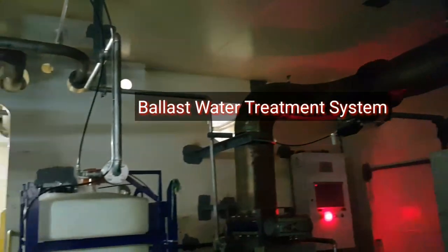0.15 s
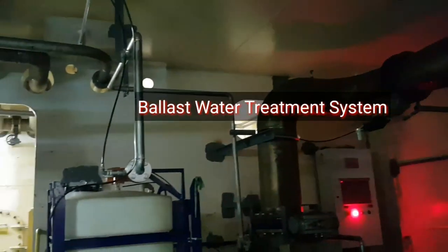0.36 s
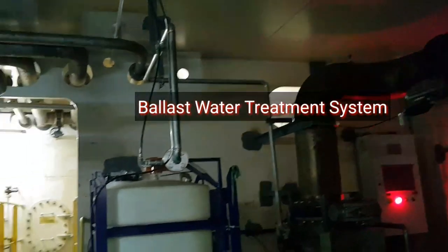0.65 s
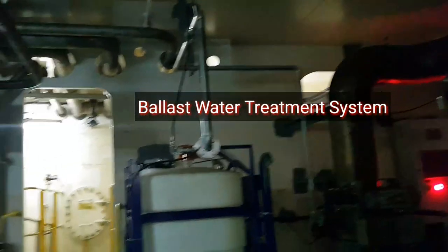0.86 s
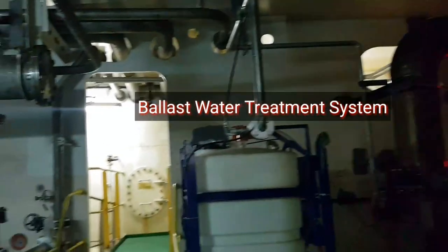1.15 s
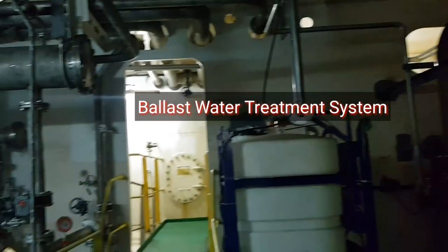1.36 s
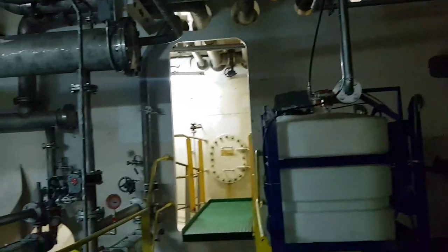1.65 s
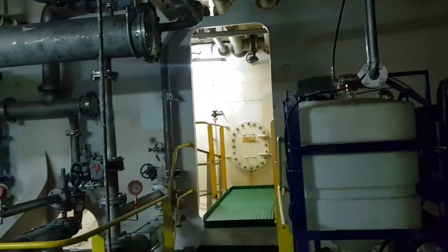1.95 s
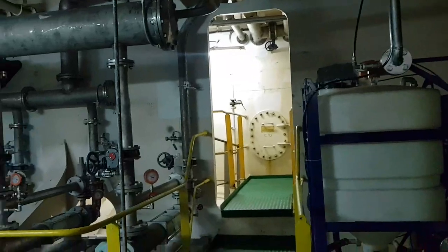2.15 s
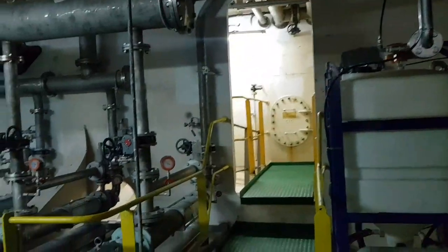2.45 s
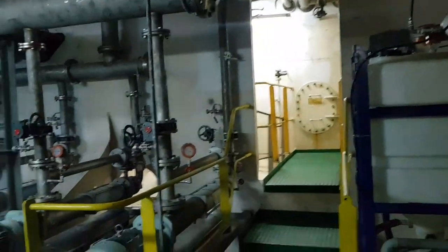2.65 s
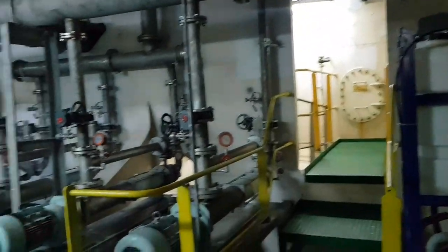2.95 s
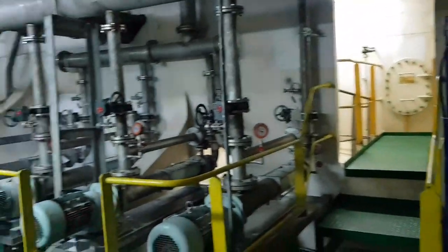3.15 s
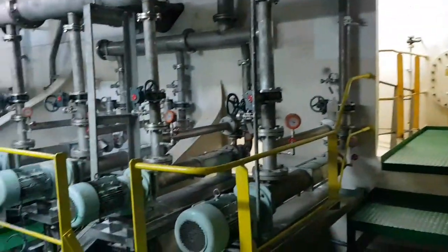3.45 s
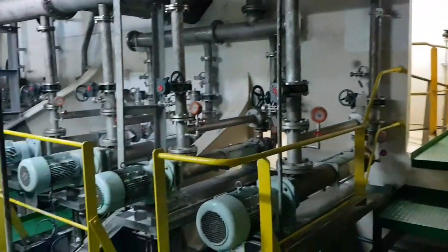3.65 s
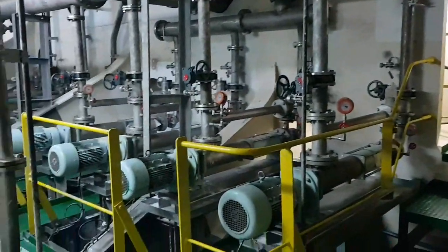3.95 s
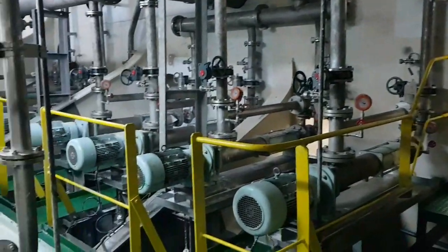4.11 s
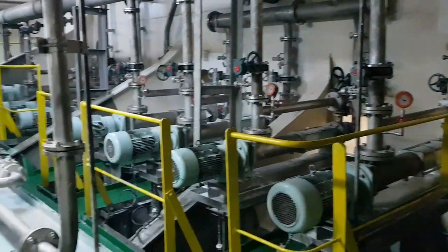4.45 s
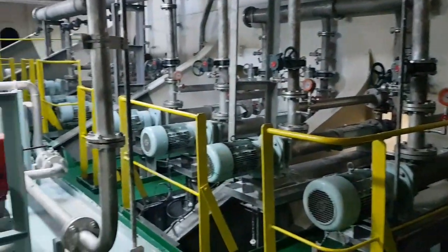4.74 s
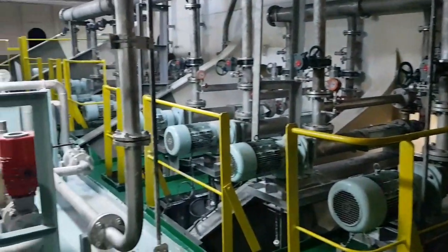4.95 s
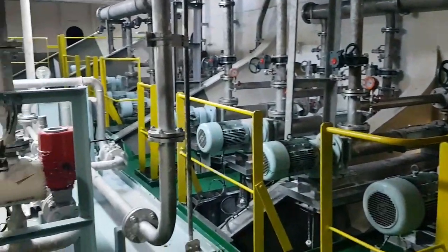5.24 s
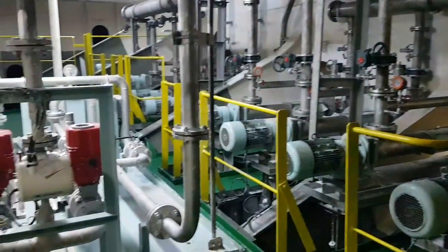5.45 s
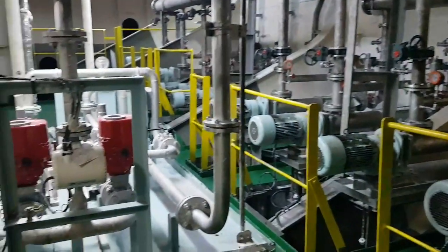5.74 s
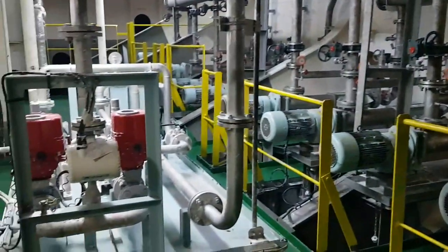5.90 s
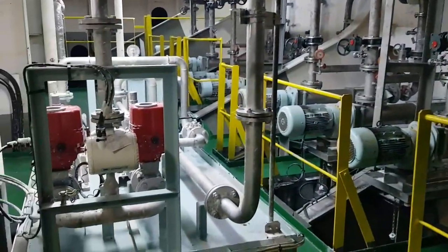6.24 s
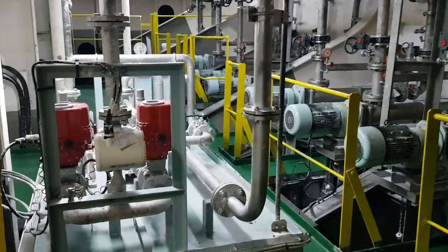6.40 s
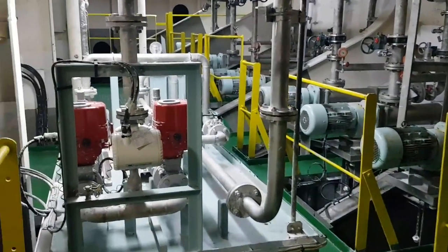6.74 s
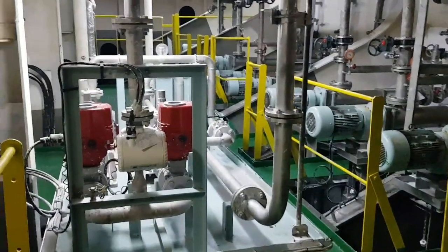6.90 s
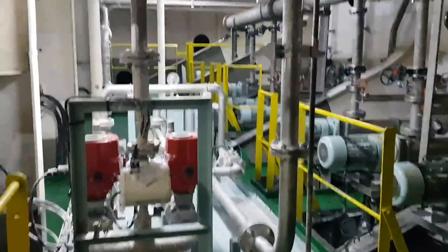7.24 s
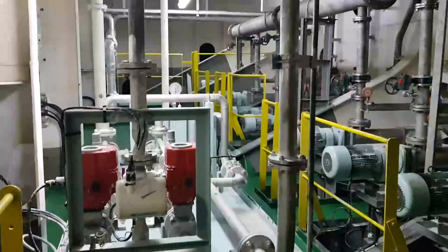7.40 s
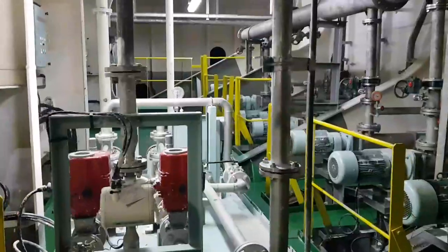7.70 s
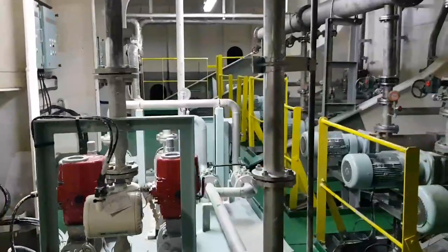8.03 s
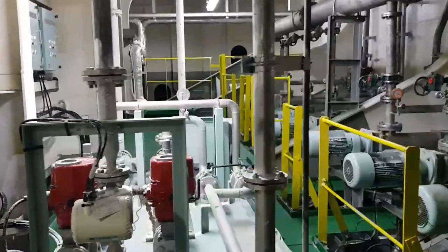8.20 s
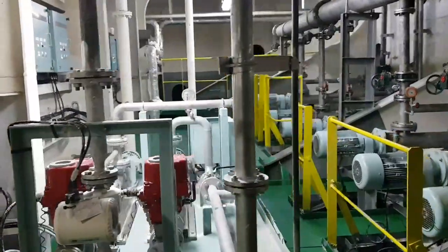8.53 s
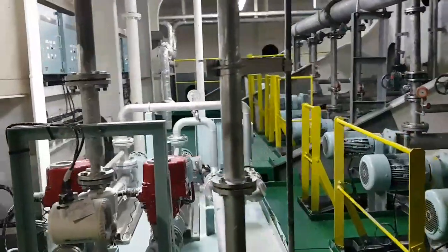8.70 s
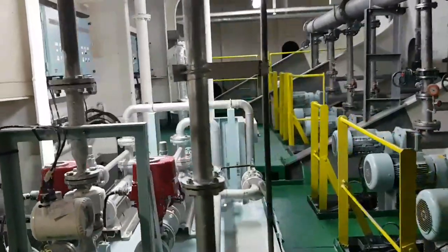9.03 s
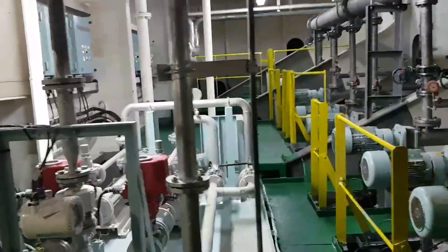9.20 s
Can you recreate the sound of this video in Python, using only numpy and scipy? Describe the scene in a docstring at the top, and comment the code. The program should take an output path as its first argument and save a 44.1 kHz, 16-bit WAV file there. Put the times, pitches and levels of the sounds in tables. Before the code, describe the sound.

Inside a large steel ship engine room, a dense low rumble and pipe-flow roar never stop. A slow main engine thumps unevenly through the hull, about eight firings a second. Generator hum and pump whines swell and dip as the listener walks past. High ventilation hiss sits on top. Near eight seconds a short bright rush passes, then the hum grows strong. Handheld stereo pickup, close and loud, no speech.

```python
"""A slow six-cylinder main engine thumps through the hull of a large steel engine room: firings strike its modes.
Generator and pump tones, wavering sines, swell and fade as one walks across the standing waves;
two gear pumps whine a little apart and blowers sing very high.
Pipe flow and ventilation, coloured noise, roar and hiss under it all; one brief bright rush comes near the end."""
import sys
import numpy as np
from scipy import signal
from scipy.fft import rfft, irfft, next_fast_len
from scipy.io import wavfile
from scipy.ndimage import uniform_filter1d, minimum_filter1d

SR = 44100
rng = np.random.default_rng(int(sys.argv[2]) if len(sys.argv) > 2 else 0)


def gain_from_decibels(decibels):
    """Convert decibel values to linear amplitude factors."""
    exponent = np.asarray(decibels, float) / 20
    return 10 ** exponent


def dump_mix(stems):
    """Bounce the given channels to the path in sys.argv[1] as a 16-bit WAV at rate SR."""
    frames = np.atleast_2d(stems).T  # one column per channel
    limited = np.clip(frames, -1, 1)  # hard clip at full scale
    pcm = np.round(limited * 32767).astype(np.int16)
    wavfile.write(sys.argv[1], SR, pcm)


N = 412776
SIZE = next_fast_len(N + 4096)
HZ = np.maximum(np.arange(SIZE // 2 + 1) * SR / SIZE, 1)
SECONDS = np.arange(N) / SR
TURNS_PER_S = 1.3235  # main engine

# likeness of the sound field at left and right: (frequency [Hz], correlation [0 to 1])
LIKENESS = [(30, 0.9), (60, 0.93), (130, 0.93), (280, 0.96), (430, 0.8), (640, 0.62), (950, 0.44),
            (1200, 0.37), (2000, 0.13), (2700, 0), (15000, 0)]


def main_engine():
    """Modal excitation: each firing strikes every damped hull mode, in a pattern that repeats once a turn."""
    # hull modes: (frequency [Hz], t60 [s], push from each of cylinders 1 to 6 [wave height before lift_db]);
    # the sign of a push is the direction in which that firing starts the mode swinging
    hull_modes = [(25.1, 0.35, -0.012, 0.023, -0.015, 0.043, -0.019, 0.016),
                  (33.5, 0.18, -0.054, 0.019, -0.022, 0.00011, -0.00082, 0.031),
                  (48.35, 0.95, -0.059, 0.057, -0.05, 0.028, -0.083, 0.01),
                  (60.5, 1, 0.0052, -0.023, -0.0011, 0.054, 0.084, 0.0007),
                  (82.1, 1, 0.069, 0.067, -0.098, 0.038, 0.077, 0.045),
                  (81.7, 0.32, -0.11, 0.0078, 0.067, -0.055, -0.085, -0.015),
                  (113, 0.35, -0.0026, -0.035, -0.0043, -0.014, 0.0018, -0.072),
                  (137.7, 1, -0.024, 0.049, -0.022, -0.016, 0.029, -0.036)]
    first_firing_s, lift_db, uneven_db = 0.102, 4.0, 0.5
    run_in = 2 * SR  # samples in which the modes build up beforehand
    firing = np.arange(-12, 6 * 12 + 2)
    firing_s = first_firing_s + firing / 6 / TURNS_PER_S
    at = np.round(firing_s * SR).astype(int) + run_in
    out = np.zeros(N + run_in)
    for hz, t60, *push in hull_modes:
        clicks = np.full(N + run_in, 1e-18)  # not quite zero, to keep the filter fast
        strength_db = lift_db + uneven_db * rng.standard_normal(len(at))
        clicks[at] = np.array(push)[firing % 6] * gain_from_decibels(strength_db)
        decay = gain_from_decibels(-60 / (t60 * SR))  # per sample
        angle = 2 * np.pi * hz / SR  # radians per sample
        out += signal.lfilter([0, np.sin(angle)], [1, -2 * decay * np.cos(angle), decay ** 2], clicks)
    out = signal.sosfilt(signal.butter(2, 16, "high", fs=SR, output="sos"), out)
    return out[run_in:]


def in_time(rows):
    """Linear interpolation: the columns of a time curve, sample by sample."""
    s, *columns = np.transpose(rows)
    return [np.interp(SECONDS, s, column) for column in columns]


def at_hz(points, hz):
    """Linear interpolation of a spectrum on a logarithmic frequency axis."""
    point_hz, value = np.transpose(points)
    return np.interp(np.log(hz), np.log(point_hz), value)


def drift(per_s):
    """Slow random process of spread 1: random points, per_s of them a second, joined by straight lines."""
    points = rng.standard_normal(400)
    joined = np.interp(SECONDS * per_s, np.arange(400), points)
    return np.sqrt(1.5) * joined  # the straight lines had cut the variance to 2/3


def tone(hz, level_db, waver_db, waver_per_s, smear, wander):
    """Interference: a sine wavers in strength and phase; reflections make the left phase wander about the right.

    smear [radians] is the spread of the phase; wander scales the left phase's departure, greater where
    the two sides are less alike.
    """
    phase = 2 * np.pi * (hz * SECONDS + rng.random()) + smear * drift(waver_per_s)
    unlikeness = np.arccos(np.clip(at_hz(LIKENESS, hz), 0, 1))
    apart = wander * unlikeness * drift(2.5)
    peak = np.sqrt(2) * gain_from_decibels(level_db + waver_db * drift(waver_per_s))
    return peak * np.sin([phase + apart, phase])


def generator():
    """Standing waves and amplitude modulation: the hum varies with place; its third harmonic throbs once a turn."""
    # hum where one stands: (time [s], hum level [dB], third harmonic level before its throb [dB])
    hum_curve = [(0.0, -31.5, -25), (0.5, -42, -40), (1.4, -47, -44), (1.9, -23, -35.5), (2.6, -21, -39),
                 (3.1, -35, -30), (4.0, -34, -31.5), (5.0, -53, -29.5), (5.9, -26, -30.5), (7.0, -27, -32),
                 (7.8, -26.5, -32.5), (8.3, -26.5, -35), (8.55, -14, -40), (8.85, -15.5, -36),
                 (9.08, -17.5, -22), (9.36, -20.5, -24)]
    hum_db, third_db = in_time(hum_curve)
    throb_depth, throb_peak_s = 0.38, 5.036
    throb = 1 + throb_depth * np.cos(2 * np.pi * TURNS_PER_S * (SECONDS - throb_peak_s))
    hum = tone(166.7, hum_db, waver_db=2.5, waver_per_s=4.5, smear=0.2, wander=0.4)
    third = tone(499.4, third_db, waver_db=0.2, waver_per_s=4.0, smear=0.14, wander=0.3)
    return hum + throb * third


def swelling(resting_db, swells):
    """Power addition: bell-shaped swells are laid over a resting level; the sum is in dB."""
    coarse = SECONDS[::100]
    bells = sum(gain_from_decibels(db) * 2. ** -(2 * (coarse - s) / length) ** 2 for s, db, length in swells)
    level_db = 20 * np.log10(np.hypot(gain_from_decibels(resting_db), bells))
    return np.interp(SECONDS, coarse, level_db)


def pump_and_blower_whines():
    """Constructive interference: each whine swells where its reflections add up."""
    # pitch of each whine: name: frequency [Hz]
    whine_hz = {"first pump": 1075.3, "second pump": 1085, "first octave": 2149, "second octave": 2170.3,
                "low blower": 10889, "high blower": 11074}
    # strength of each whine between swells: name: level [dB]
    whine_resting_db = {"first pump": -37, "second pump": -38, "first octave": -49, "second octave": -45,
                        "low blower": -65, "high blower": -65}
    # swells of each whine: name: (time [s], peak level [dB], length at half height [s])
    whine_swells = {"first pump": [(.35, -31, 0.2), (.89, -32, 0.24), (1.35, -32, 0.18), (1.75, -35, .22),
                    (3.1, -31.5, 0.47), (3.88, -26, 0.17), (4.5, -25.5, 0.49), (5.13, -25.5, 0.37),
                    (5.8, -29.5, 0.21), (6.1, -24.5, 0.24), (6.72, -24.5, 0.34), (7.73, -26, 0.28),
                    (8.15, -22.5, 0.1), (8.48, -23.5, 0.16)], "second pump": [(0.0, -38, 0.44),
                    (.69, -35, 0.24), (1.15, -41, .3), (2.0, -30, .2), (2.29, -30.5, .22), (2.62, -37, .18),
                    (2.96, -27, 0.18), (6.3, -31.5, 0.51)], "first octave": [(1.37, -40, 0.26),
                    (2.37, -35, 0.15), (3.18, -42, .38), (3.64, -35, .21), (4.22, -34, 0.19),
                    (4.54, -32.5, 0.11), (6.02, -37, 0.16), (6.39, -38.5, 0.2), (6.95, -36.5, .55),
                    (8.28, -38, 0.37), (9.06, -43, 0.29)], "second octave": [(1.05, -43, .35),
                    (1.8, -45, 0.79), (3.2, -37, 0.32), (3.71, -44, 0.18), (4.5, -47.5, 0.81),
                    (5.26, -52, .35), (7.5, -46, .6), (9.15, -39, .2)], "low blower": [(.71, -52, .45),
                    (1.31, -54, .3), (3.0, -61, .5), (3.75, -57, .5), (6.15, -56, .35)],
                    "high blower": [(2.08, -51, .17), (3.4, -58, .5), (4.83, -56, .2), (5.9, -60, .3),
                    (6.84, -57, .3), (9.15, -59, .25)]}
    out = np.zeros((2, N))
    for name, hz in whine_hz.items():
        level_db = swelling(whine_resting_db[name], whine_swells[name])
        out += tone(hz, level_db, waver_db=1.5, waver_per_s=16.0, smear=0.42, wander=0.9)
    return out


def weaker_machine_tones():
    """Superposition: weaker steady machine tones add up as independently wavering sines."""
    # weaker steady machine tones, with generator harmonics and engine-rate side tones: (frequency [Hz], level [dB])
    weak_tones = [(118.4, -31.5), (158.8, -30.5), (162.8, -31.5), (237, -34.5), (270.5, -34),
                  (333.1, -35.5), (355.3, -37), (592.2, -44.5), (666.2, -43.5), (908.4, -43), (923.9, -49),
                  (1078.5, -44), (1108.3, -45), (1241.5, -51), (1590.1, -48), (2141.2, -48),
                  (2155.5, -46.5), (2163, -51), (2605.5, -57.5), (3062, -67), (3106.2, -59), (3129.7, -66),
                  (3141.2, -56.5), (3164, -68.5), (3222, -69), (3244.8, -62), (3528, -68), (3695, -75),
                  (3722, -67), (4122, -68), (4214.5, -60), (4222.5, -59), (4296, -67), (4340, -61.5),
                  (4492, -67), (10790, -74), (11356, -74)]
    return sum(tone(hz, db, waver_db=3.0, waver_per_s=7.0, smear=0.89, wander=0.72) for hz, db in weak_tones)


def unlike(first, second, hz):
    """Spatial coherence: left hears the first field; right shares it as far as reflections allow."""
    alike = np.clip(at_hz(LIKENESS, hz), 0, 1)
    return np.array([first, alike * first + np.sqrt(1 - alike ** 2) * second])


def air_noise(spectrum, low_hz, high_hz, level_db):
    """Resonant filtering: casings colour diffuse noise, scaled to rms 1 from low_hz to high_hz before its level."""
    # casing and duct resonances: (frequency [Hz], width at half the boost or cut [Hz], boost or cut [dB])
    casings = [(49.3, 6.3, 9.5), (66, 18, -4.5), (88.6, 14, 3.5), (103.3, 9.6, -6), (116.8, 12.6, 5),
               (152, 16, 2), (240.5, 20, 2.5), (895, 45, 4), (1082, 91, 5.5), (1630, 230, 1),
               (2165, 61, 5.5), (3145, 83, 7.5), (3270, 55, 4), (3577, 53, 4.5), (4213, 66, 5),
               (4300, 150, 2), (4338, 62, 3)]
    resonance_db = sum(db / (1 + (2 * (HZ - hz) / wide) ** 2) for hz, wide, db in casings)
    shape = gain_from_decibels(at_hz(spectrum, HZ) + resonance_db)
    shape = shape * (HZ > spectrum[0][0]) * (HZ < spectrum[-1][0])
    band = (HZ > low_hz) & (HZ < high_hz)
    shape = shape / np.sqrt(2 * np.sum(shape[band] ** 2) / SIZE)
    first, second = rfft(rng.standard_normal((2, SIZE)))
    return irfft(unlike(first, second, HZ) * shape, SIZE)[:, :N] * gain_from_decibels(level_db)


def bright_rush():
    """Amplitude-shaped noise: a band of bright noise rises and dies away within about half a second."""
    # strength of the rush: (time [s], level [dB])
    rush_curve = [(7.85, -90), (7.96, -32), (8.08, -30), (8.22, -46), (8.4, -90)]
    # its relative spectrum: (frequency [Hz], density [dB per Hz])
    rush_spectrum = [(900, -30), (1400, 6), (1900, 5), (2350, -12), (2750, 1.5), (3300, -24), (4500, -40)]
    return air_noise(rush_spectrum, 1200, 3200, *in_time(rush_curve))


def pipe_flow(near_db):
    """Broadband flow noise: a low rumble follows the nearness of the pipes, a higher roar about half as far."""
    # relative spectrum of the rumble: (frequency [Hz], density [dB per Hz])
    rumble_spectrum = [(11, -40), (20, -24), (30, -11), (68, -6.5), (102, -3), (150, -1.5), (252, -3.5),
                       (350, -6), (446, -10), (751, -19.5), (1000, -22.5), (1300, -41)]
    # relative spectrum of the roar: (frequency [Hz], density [dB per Hz])
    roar_spectrum = [(350, -1.5), (600, -5), (950, -9.5), (1250, -7.5), (1600, -8.5), (2020, -12.5),
                     (2450, -20), (3170, -23.5), (3900, -24.5), (4400, -24), (5360, -31.5), (7000, -44),
                     (9100, -63)]
    roar_follows = 0.52  # share of the rumble's swing in dB
    roar_db = -30 + roar_follows * near_db + 0.69 * drift(12)
    rumble = air_noise(rumble_spectrum, 180, 480, -18 + near_db)
    return rumble + air_noise(roar_spectrum, 1200, 2000, roar_db)


def duct_hiss(ducts_db):
    """Broadband flow noise: the ventilation hiss follows the nearness of the ducts and flutters as a whole."""
    # relative spectrum of the hiss: (frequency [Hz], density [dB per Hz])
    hiss_spectrum = [(3530, -37), (6000, -7), (7590, -6.5), (8680, -1), (10900, 0.5), (12900, -5.5),
                     (14600, -6.5), (15500, -11)]
    flutter_db = 0.44 * drift(4.0) + 0.5 * drift(10) + 0.5 * drift(35)
    return air_noise(hiss_spectrum, 7500, 10500, -48.7 + ducts_db + flutter_db)


def scene():
    """Superposition of engine, machine tones and air noise along the walk."""
    # nearness along the walk: (time [s], to the pipes [dB], to the air ducts [dB])
    walk = [(0.0, -1.5, -1), (0.4, -.5, -1), (1.2, 0.6, 0), (1.7, 0, -1), (2.4, -0.5, 0.5),
            (2.95, -0.5, -0.5), (3.75, .5, 1.5), (4.6, .6, 0.3), (5.6, 0, .7), (6.0, 0, 0), (6.7, 0.7, .8),
            (7.2, -0.6, -0.5), (7.8, 0, 1), (8.1, 2.5, 0.5), (8.4, -.5, -0.5), (9.36, -1.3, -0.5)]
    near_db, ducts_db = in_time(walk)
    machines = generator() + pump_and_blower_whines() + weaker_machine_tones()
    air = bright_rush() + pipe_flow(near_db) + duct_hiss(ducts_db)
    return main_engine() + machines + air


def band_limit(x):
    """A steep low-pass at the top of the band."""
    return signal.sosfilt(signal.butter(12, 15670, fs=SR, output="sos"), x)


def record(dry):
    """Linear filtering and limiting: two ports of unequal colour share the power, and peaks stay under full scale."""
    # balance of the ports: (frequency [Hz], left over right [dB])
    port_balance = [(40, -2), (120, -4.5), (280, -6), (500, -7), (790, -2), (1200, -5), (1750, -7),
                    (2200, -2), (2700, 7), (3300, 6.5), (4500, 0), (5600, 5.5), (7000, 19), (8500, 67),
                    (11000, 23), (14200, 41), (15000, 30)]
    # the left port is reached first: (frequency [Hz], phase lead [radians])
    port_lead = [(0, 0), (500, 0.6), (1100, 1.15), (1380, 3), (2150, 7), (3700, 8.5), (15600, 43.5)]
    power_ratio = gain_from_decibels(2 * at_hz(port_balance, HZ))
    lead = np.exp(1j * np.interp(HZ, *np.transpose(port_lead)))
    ports = np.sqrt(2 / (1 + power_ratio)) * np.array([np.sqrt(power_ratio) * lead, np.ones_like(HZ)])
    mirrored = np.pad(dry, [(0, 0), (2048, 2048)], mode="reflect")  # keeps the ends from wrapping round
    wet = irfft(rfft(mirrored, SIZE) * ports, SIZE)[:, 2048:N + 2048]
    ceiling = 0.99
    gain = ceiling / np.maximum(np.abs(wet).max(axis=0), ceiling)
    gain = minimum_filter1d(gain, size=401)
    gain = uniform_filter1d(uniform_filter1d(gain, size=201), size=201)  # eases down and back over about 9 ms
    return band_limit(wet * gain)


dry = scene()
out = record(dry)
dump_mix(out)
```